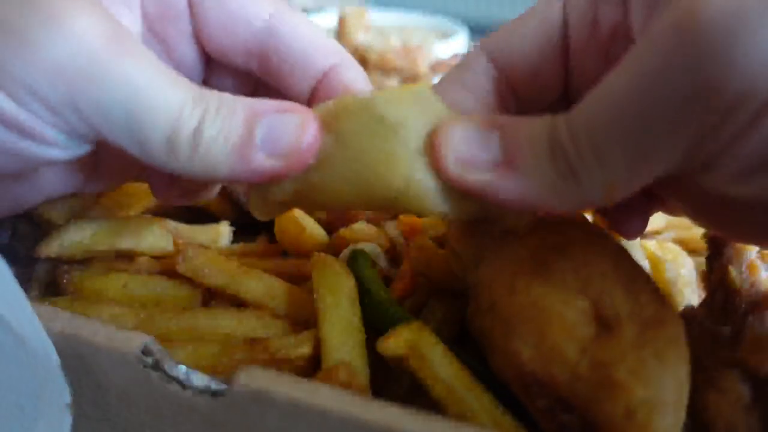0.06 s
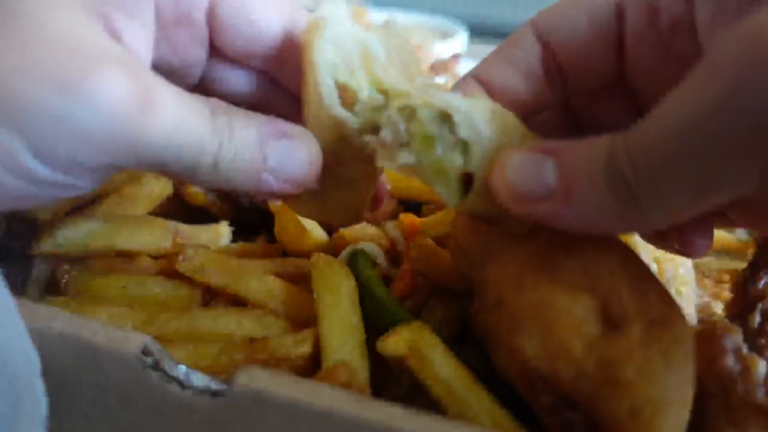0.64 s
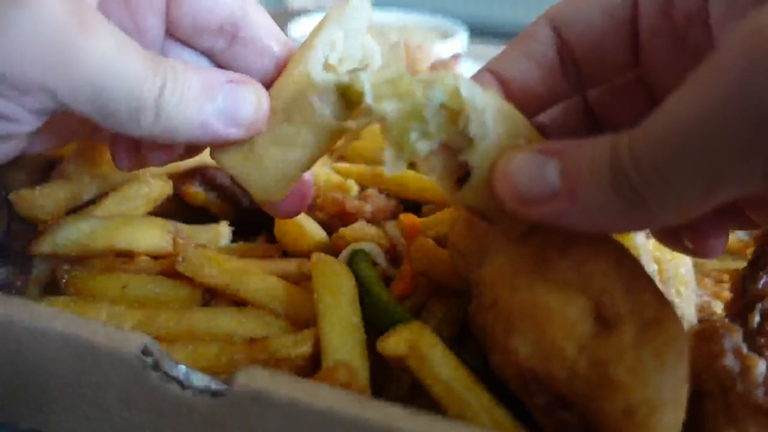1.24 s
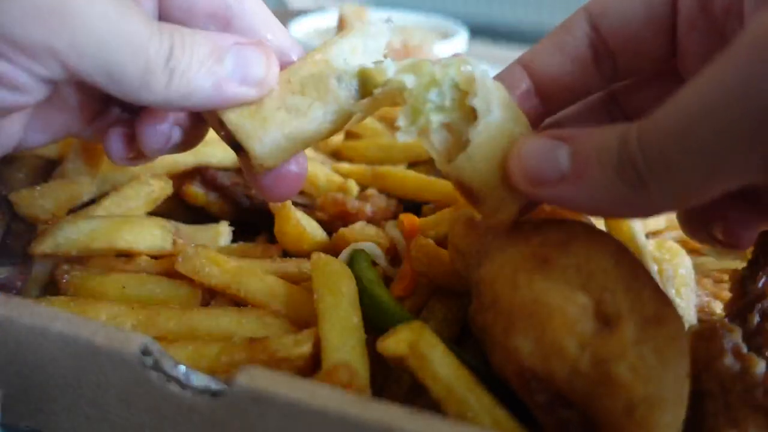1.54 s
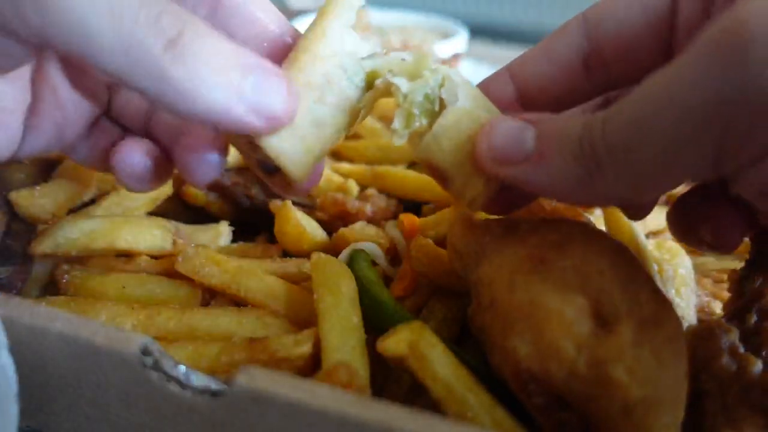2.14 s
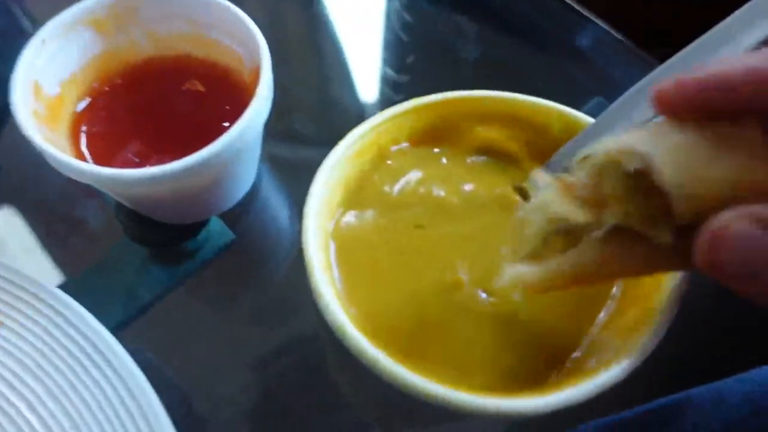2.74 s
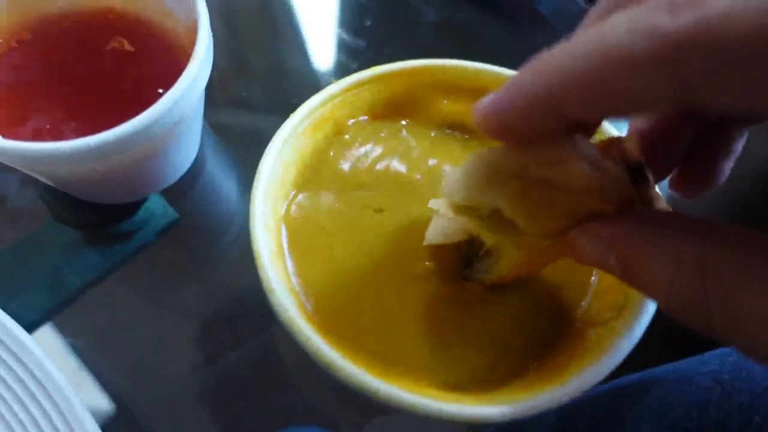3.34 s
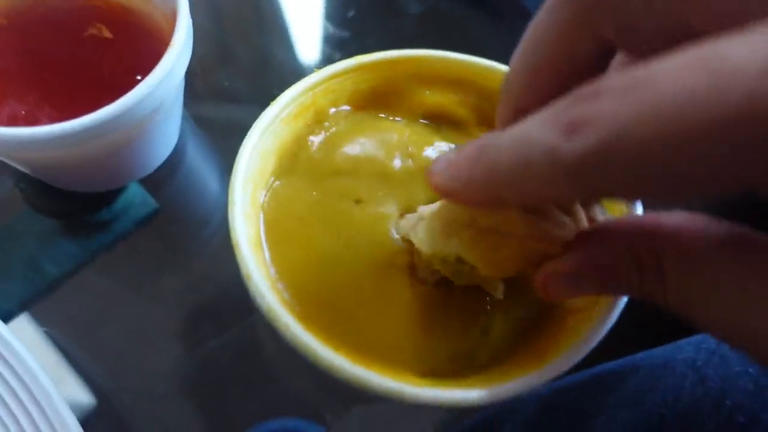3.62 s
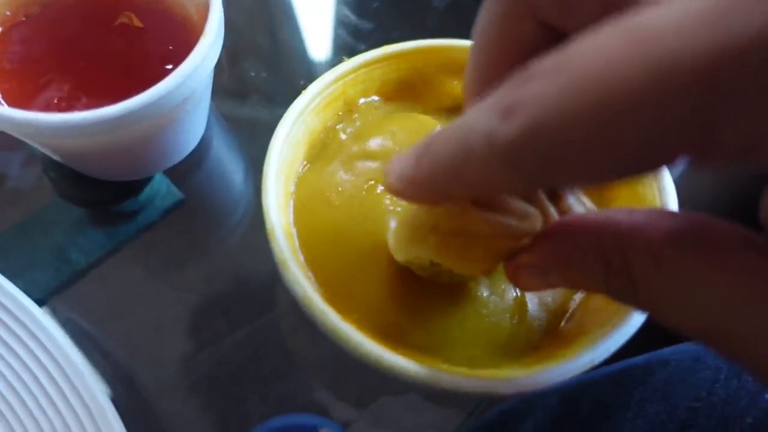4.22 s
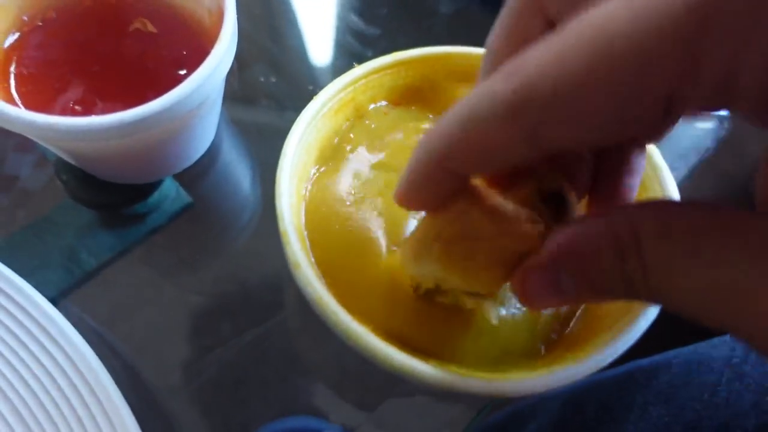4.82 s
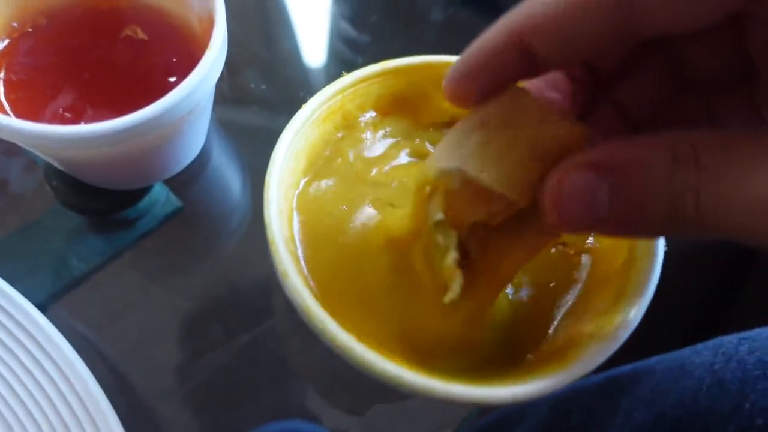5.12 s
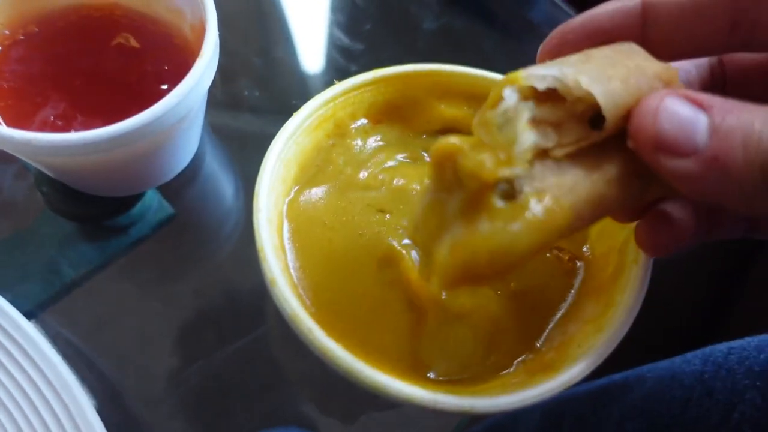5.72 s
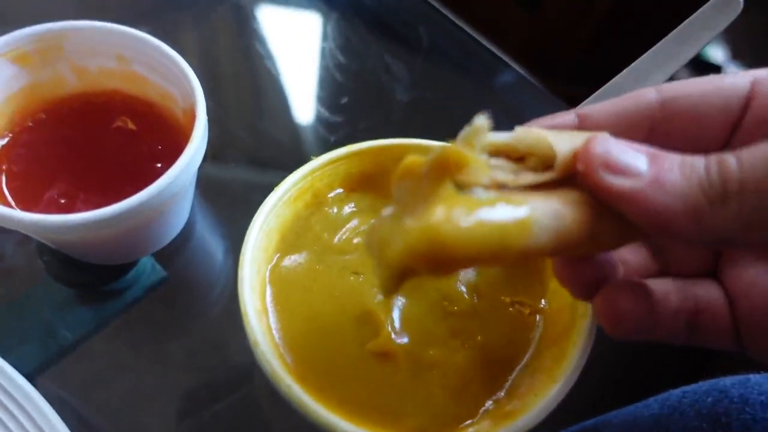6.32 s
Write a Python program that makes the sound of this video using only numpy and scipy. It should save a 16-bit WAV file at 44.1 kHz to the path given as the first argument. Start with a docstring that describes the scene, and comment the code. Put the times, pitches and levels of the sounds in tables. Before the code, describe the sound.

Close crunching of a fried pastry being broken, followed by soft squelches in a tub of sauce, over steady clock ticking.

```python
"""Spring roll, broken and dipped

A fried spring roll is bent and pulled apart close by: its shell creaks, crackles and snaps, and the
moist filling squeaks. One half is pushed through thick sauce with small sticky clicks and bumps the
bottom of the tub. A clockwork ticks once a second in the quiet room; a hand-held camera rumbles."""
import sys
import numpy as np
from scipy import signal
from scipy.fft import rfft, irfft, next_fast_len
from scipy.io import wavfile
from scipy.ndimage import uniform_filter1d

SR = 44100
rng = np.random.default_rng(int(sys.argv[2]) if len(sys.argv) > 2 else 0)


def persist_wave(psi):
    """Save psi, clipped to +-1, as 16-bit WAV."""
    counts = np.round(np.clip(psi, -1, 1) * 32767).astype(np.int16)
    wavfile.write(sys.argv[1], SR, np.atleast_2d(counts).T)


N = 289560


def amp(db):
    return 10 ** (np.asarray(db) / 20)


def unit(x):
    return x / np.sqrt(np.mean(x ** 2) + 1e-20)


def even(x):
    """Level x to rms 1 over a sliding 40 ms."""
    return x / np.sqrt(np.abs(uniform_filter1d(x ** 2, size=1800)) + 1e-6)


def burst(x):
    """Scale x to the energy of 1 ms at rms 1."""
    return x * np.sqrt(SR / 1000 / np.sum(x ** 2))


def add(track, start_s, x):
    part = track[round(start_s * SR):][:len(x)]
    part += x[:len(part)]


def log_interp(points, hz):
    point_hz, values = np.transpose(points)
    return np.interp(np.log(hz + 1), np.log(point_hz + 1), values)


def coloured(x, spectrum, size=4096):
    """Minimum-phase filter from rows of f/Hz, gain/dB."""
    gain = amp(log_interp(spectrum, np.fft.rfftfreq(size, 1 / SR)))
    cepstrum = irfft(np.log(gain))
    cepstrum[1:size // 2] *= 2
    cepstrum[size // 2 + 1:] = 0
    return signal.oaconvolve(x, irfft(np.exp(rfft(cepstrum))))[:len(x)]


def noise(spectrum):
    return unit(coloured(rng.standard_normal(N), spectrum))


def patchy(x, depth_db):
    """Shifting cavities and contacts give each moment its own resonances; rms 1."""
    bins = signal.stft(x, nperseg=256)[2]
    field = uniform_filter1d(rng.standard_normal(bins.shape), size=5, axis=0)
    field = unit(uniform_filter1d(field, size=9, axis=1))
    return unit(signal.istft(bins * amp(depth_db * field), nperseg=256)[1][:N])


def grains(per_s, spread_db, bed):
    """Tiny random fractures of very unequal size over a bed of rubbing noise."""
    sizes = amp(spread_db * np.minimum(rng.standard_normal(N), 2)) * rng.choice([-1, 1], N)
    impulses = sizes * (rng.random(N) < per_s / SR)
    return even(unit(impulses) + bed * rng.standard_normal(N))


def pops(per_s, pitch_hz, scatter, cycles, spread_db, bed):
    """Tiny pockets burst at random over a noise bed, each ringing at its own pitch."""
    count = int(per_s * N / SR)
    detune, size, polarity = np.hsplit(rng.standard_normal((count, 3)), 3)
    starts = (rng.random(count) * N).astype(int)
    hz = np.clip(pitch_hz * np.exp(scatter * detune), 200, 15000)
    n = np.arange(SR // 200)
    turns = hz * n / SR
    envelopes = amp(spread_db * np.minimum(size, 2) - 60 * turns / cycles)
    rings = envelopes * np.sin(2 * np.pi * turns) * np.sign(polarity)
    stream = np.bincount((starts[:, None] + n).ravel(), rings.ravel(), N)[:N]
    return even(unit(stream) + bed * rng.standard_normal(N))


def strokes(rows, grip, attack_s, release_s, swell_db):
    """Level/dB per layer: strokes set in, swell with pressure and die away over a faint loose grip."""
    t = np.arange(N) / SR
    begin_s, end_s, *grip_db = grip
    power = np.outer(amp(grip_db) ** 2, (t >= begin_s) & (t < end_s))
    for start_s, length_s, *layer_db in rows:
        age_s = t - start_s
        attack = np.clip(age_s / attack_s + 0.5, 0, 1)
        release = np.exp(-np.maximum(age_s - length_s, 0) / release_s)
        pressure = np.sin(np.pi * np.clip(age_s / length_s, 0, 1))
        power += np.outer(amp(layer_db), attack * release * amp(swell_db * (pressure - 1))) ** 2
    return 10 * np.log10(power + 1e-12)


# camera sway: t/s, rumble level/dB, rustle level/dB
CAMERA_SWAY = [(0, -58, -67), (1.7, -69.5, -73.5), (2.7, -54, -63), (3.3, -60.5, -66), (4.5, -63.5, -67),
               (5.7, -65.5, -69.5), (6.0, -53, -65), (6.57, -65, -71)]
# noise spectra: f/Hz, relative level/dB
RUMBLE_SPECTRUM = [(12, 7.5), (20, -2), (31, -7.5), (45, -7.5), (70, -24), (300, -60.5)]
RUSTLE_SPECTRUM = [(25, -3), (70, -3), (110, -0.5), (146, 5), (180, -0.5), (400, -4), (800, -8),
                   (1400, -14.5), (3000, -34)]
HISS_SPECTRUM = [(30, 8.5), (1000, 7), (2200, 4), (5000, -2.5), (8500, -3), (11000, -2.5), (16000, -5.5)]

def background():
    """The camera rumbles as it sways and the grip on it rustles, over a steady hiss."""
    times_s, *levels_db = np.transpose(CAMERA_SWAY)
    t = np.arange(N) / SR
    rumble_db, rustle_db = [np.interp(t, times_s, db) for db in levels_db]
    rumble = amp(rumble_db) * noise(RUMBLE_SPECTRUM)
    rustle = amp(rustle_db) * patchy(noise(RUSTLE_SPECTRUM), depth_db=3)
    return rumble + rustle + amp(-72.5) * noise(HISS_SPECTRUM)


# bends: t/s, length/s, rub level/dB, crunch level/dB, flake level/dB
SHELL_BENDS = [(0.0, 0.018, -46, -55.5, -56), (0.05, 0.088, -62, -62.5, -58),
               (0.14, 0.05, -59.5, -57, -55.5), (0.215, 0.054, -55.5, -55, -55.5),
               (0.28, 0.034, -65, -60, -58.5), (0.35, 0.13, -70, -65.5, -64.5),
               (0.485, 0.073, -53.5, -59.5, -62.5), (0.575, 0.037, -56.5, -55, -58),
               (0.633, 0.015, -56, -48.5, -50), (0.695, 0.015, -63.5, -51, -45),
               (0.747, 0.014, -61, -55.5, -47.5), (0.872, 0.023, -58.5, -52.5, -47),
               (0.98, 0.029, -70.5, -65.5, -60), (1.08, 0.1, -70, -71, -65), (1.33, 0.14, -88, -62, -57),
               (1.574, 0.016, -82, -69.5, -60), (2.125, 0.2, -81, -65, -62), (2.365, 0.17, -82, -67.5, -62),
               (2.52, 0.066, -61, -65.5, -58)]
# loose grip: from t/s, to t/s, rub level/dB, crunch level/dB, flake level/dB
DRY_GRIP = (-0.5, 3.5, -78, -75.5, -76)
# shell spectra: f/Hz, relative level/dB
RUB_SPECTRUM = [(50, -8), (130, -5.5), (230, -1), (380, -10), (520, -2.5), (1200, -1.5), (1800, -7),
                (3500, -16)]
CRUNCH_SPECTRUM = [(700, -46), (1500, -1), (2500, -1.5), (4500, 3), (6000, -10), (9000, -34)]
FLAKE_SPECTRUM = [(3500, -33), (5500, 1.5), (7000, 2), (8500, 7), (10500, -3), (13500, 5.5), (16000, -13)]

def shell():
    """Fingers rub the hollow skin; each bend crumbles a patch into crunch and fine flakes."""
    rub_db, crunch_db, flake_db = strokes(
        SHELL_BENDS, DRY_GRIP, attack_s=0.016, release_s=0.018, swell_db=0)
    fractures = grains(per_s=800, spread_db=10.5, bed=0.51)
    crumbs = pops(per_s=1300, pitch_hz=2420, scatter=0.62, cycles=12, spread_db=2.5, bed=0.41)
    friction = pops(per_s=700, pitch_hz=876, scatter=0.61, cycles=8, spread_db=3.5, bed=2.7)
    rub = patchy(coloured(friction, RUB_SPECTRUM), depth_db=2.5)
    crunch = patchy(coloured(fractures + 0.64 * crumbs, CRUNCH_SPECTRUM), depth_db=3)
    fine_pops = pops(per_s=1800, pitch_hz=9200, scatter=0.42, cycles=6.1, spread_db=7, bed=0.61)
    flakes = patchy(coloured(1.9 * fractures + fine_pops, FLAKE_SPECTRUM), depth_db=3.5)
    return amp(rub_db) * rub + amp(crunch_db) * crunch + amp(flake_db) * flakes


def chatter(modes, t60_s, rise_s, tilt_db_oct=0):
    """A contact stutters for a few ms and rings a body; the tilt acts above 2 kHz."""
    hz = np.linspace(0, SR / 2, 2049)
    gain = sum(amp(db) / (1 + (2 * (hz - mode_hz) / width_hz) ** 2) for mode_hz, width_hz, db in modes)
    gain_db = 20 * np.log10(gain) + tilt_db_oct * np.log2(np.maximum(hz / 2000, 1))
    t = np.arange(SR // 10) / SR
    force = rng.standard_normal(len(t)) * (1 - np.exp(-t / rise_s)) * amp(-60 * t / t60_s)
    return burst(coloured(force, np.column_stack([hz, gain_db])))


# first squeeze: t/s, level/dB
SKIN_CREAKS = [(0.009, -41), (0.074, -42), (0.12, -35), (0.1288, -33), (0.143, -40), (0.152, -32.5)]
# closed roll: f/Hz, width/Hz, relative level/dB
ROLL_MODES = [(750, 470, -10), (1120, 230, 1), (2060, 150, -3), (2390, 520, -3)]

def creaks():
    """The skin buckles and rings the hollow of the unbroken roll."""
    out = np.zeros(N)
    for start_s, db in SKIN_CREAKS:
        add(out, start_s, amp(db) * chatter(ROLL_MODES, t60_s=0.031, rise_s=0.00036))
    return out


# bright edge of a click: f/Hz, relative level/dB
CRACK_SPECTRUM = [(2000, -33.5), (6200, -6), (8500, 1), (10500, -7.5), (13500, 0.5), (16000, -10.5)]

def clicks(rows, body_spectrum, grit, fizz, body_t60_s, cycles):
    """A short ring, a noisy body and a bright crack; fizz makes weak clicks noisier."""
    out, t = np.zeros(N), np.arange(SR // 50) / SR

    def puff(spectrum, t60_s):
        decaying = rng.standard_normal(len(t)) * amp(-60 * t / t60_s)
        return burst(coloured(decaying, spectrum, size=1024))

    for start_s, ring_db, hz, crack_db in rows:
        swell = 1 - np.exp(-2 * t * hz)
        ring = burst(np.sin(2 * np.pi * hz * t) * swell * amp(-60 * t * hz / cycles))
        tilt_db_oct = 0.18 * (crack_db + 29)  # harder is brighter
        crack = puff([(f, db + tilt_db_oct * np.log2(f)) for f, db in CRACK_SPECTRUM], t60_s=0.0054)
        body = grit * amp(-fizz * (ring_db + 33.5)) * puff(body_spectrum, body_t60_s)
        add(out, start_s, amp(ring_db) * burst(ring + body) + amp(crack_db) * crack)
    return out


# shell cracks: t/s, ring level/dB, ring f/Hz, crack level/dB
SHELL_SNAPS = [(0.0255, -38, 557, -55), (0.143, -31.5, 4940, -26.5), (0.1527, -45, 2200, -38),
               (0.2642, -50, 2400, -42), (0.3695, -39.5, 3480, -49.5), (0.4085, -48.5, 3100, -51),
               (0.436, -43.5, 4280, -37.5), (0.511, -56, 5000, -43), (0.5254, -44, 4150, -43),
               (0.546, -30, 1710, -38.5), (0.606, -43, 3800, -49), (0.6258, -48, 4500, -40.5),
               (0.645, -39.5, 4340, -35.5), (0.656, -44, 4500, -41), (0.7105, -37, 4710, -25.5),
               (0.781, -51, 5000, -46), (0.8255, -47, 1530, -43.5), (0.8655, -43.5, 1500, -43),
               (0.893, -41, 1400, -44), (0.901, -53, 4500, -47), (0.9232, -46, 1660, -48),
               (1.072, -48.5, 2300, -51), (1.0909, -45, 2940, -45), (1.1044, -51, 5370, -35.5),
               (1.1202, -34, 1910, -29.5), (1.1303, -49, 2180, -43), (1.1428, -43, 2580, -41),
               (1.1512, -41.5, 2780, -37), (1.166, -42, 1850, -38.5), (1.177, -56, 3000, -50),
               (1.303, -53, 1940, -49), (1.3907, -47.5, 4540, -49), (1.4643, -44, 5170, -37.5),
               (1.5863, -45.5, 5030, -45), (1.838, -53, 3900, -56), (2.2113, -42.5, 2700, -38),
               (2.3364, -45, 5370, -43), (2.4695, -64, 3910, -39), (2.5014, -32.5, 1330, -28.5),
               (2.5079, -39.5, 2040, -43), (2.5133, -30, 2110, -20), (2.5151, -27, 8300, -13.3),
               (2.589, -46, 1100, -43)]
# splintering shell: f/Hz, relative level/dB
SPLINTER_SPECTRUM = [(60, -0.5), (180, 3.5), (450, -5), (1000, -1), (1900, -2), (4500, -1), (7500, -9.5),
                     (10000, -26)]

def snaps():
    """The dry shell cracks and knocks on the hollow roll."""
    return clicks(SHELL_SNAPS, SPLINTER_SPECTRUM, grit=0.52, fizz=0, body_t60_s=0.029, cycles=3.7)


# gear release, strike, rebound and latch: t/s, level/dB
TOOTH_CONTACTS = [(0.638, -39), (0.649, -33.5), (0.654, -33.5), (0.686, -38.5), (0.693, -41),
                  (0.701, -37.5), (1.628, -37), (1.637, -42), (1.647, -38), (1.655, -28.5), (1.66, -32.5),
                  (1.664, -32), (1.683, -40), (1.688, -38.5), (1.696, -40), (1.703, -37), (1.73, -37),
                  (1.747, -52), (2.625, -43.5), (2.637, -37), (2.645, -26.5), (2.653, -31), (2.659, -35),
                  (2.687, -35.5), (2.692, -37), (2.708, -38.5), (2.7612, -38.5), (3.629, -40.5),
                  (3.638, -39), (3.654, -30), (3.659, -30.5), (3.696, -43), (3.709, -40.5), (3.72, -40),
                  (3.745, -47), (4.629, -38), (4.635, -37.5), (4.647, -39), (4.651, -33), (4.66, -44),
                  (4.677, -38.5), (4.701, -39.5), (4.727, -45), (4.749, -38.5), (5.626, -42),
                  (5.639, -42.5), (5.653, -31), (5.661, -31), (5.684, -34), (5.691, -35), (5.7, -40.5),
                  (5.703, -41.5), (5.7259, -35.5), (5.743, -49.5)]
# clock case: f/Hz, width/Hz, relative level/dB
CASE_MODES = [(287, 110, -10), (800, 240, -11.5), (1407, 266, -3.5), (2145, 390, 0), (2940, 270, 0.5),
              (3380, 550, -7), (4310, 400, -1.5), (4780, 380, -4), (5630, 500, 0), (5960, 430, -7),
              (6900, 510, -9), (7500, 500, -14), (9070, 1500, -22.5)]

def clock(strike_s=0.644, release_db_oct=-4):
    """A gear steps once a second; its teeth ring the plastic case, dull before the strike."""
    out = np.zeros(N)
    for start_s, db in TOOTH_CONTACTS:
        releasing = start_s % 1 < strike_s
        tilt_db_oct = 0.12 * (db + 31) + release_db_oct * releasing  # harder is brighter
        tick = chatter(CASE_MODES, t60_s=0.024, rise_s=0.00075, tilt_db_oct=tilt_db_oct)
        add(out, start_s, amp(db) * tick)
    return out


# slips: t/s, length/s, first f/Hz, last f/Hz, level/dB
FILLING_SLIPS = [(1.988, 0.014, 3070, 2330, -57.5), (1.994, 0.072, 2250, 2350, -64.5),
                 (2.015, 0.051, 1596, 1695, -56.5), (2.048, 0.021, 2080, 2680, -54.5)]

def squeak(roughness=0.11):
    """Moist filling parts in short slips at an unsteady, gliding rate."""
    out = np.zeros(N)
    for start_s, length_s, first_hz, last_hz, db in FILLING_SLIPS:
        progress = np.linspace(0, 1, round(length_s * SR))
        jitter = unit(uniform_filter1d(rng.standard_normal(SR // 4), size=24))[:len(progress)]
        hz = (first_hz + (last_hz - first_hz) * progress) * (1 + roughness * jitter)
        tone = np.sqrt(2) * np.sin(2 * np.pi * np.cumsum(hz) / SR)
        add(out, start_s, amp(db) * np.sin(np.pi * progress) * tone)
    return out


# sauce letting go: t/s, ring level/dB, ring f/Hz, crack level/dB
SAUCE_CLICKS = [(2.821, -48.5, 3820, -45.5), (2.983, -43.5, 3020, -60), (3.062, -50, 2400, -59),
                (3.13, -37.5, 4250, -43), (3.1448, -43, 3980, -48), (3.161, -43, 3730, -53),
                (3.1662, -49, 4470, -52), (3.1758, -49, 3660, -45), (3.2795, -42, 2530, -50),
                (3.364, -47, 2950, -48.5), (3.4076, -39, 2540, -47.5), (3.611, -36, 2270, -35),
                (3.6162, -33, 2660, -38), (3.641, -42, 2300, -32.5), (3.7785, -39.5, 4300, -34),
                (3.919, -44, 2200, -53), (3.952, -42, 2400, -46), (4.008, -29.5, 2200, -40),
                (4.0241, -41, 2160, -62), (4.0797, -41.5, 2850, -32), (4.0888, -33, 2150, -39),
                (4.092, -34, 2030, -61), (4.0959, -40, 2170, -57.5), (4.8028, -41.5, 3600, -58),
                (4.8296, -46, 3500, -62), (4.8855, -47.5, 3880, -62), (5.0124, -43, 3290, -51.5),
                (5.2379, -47, 3980, -53), (5.391, -48, 3700, -61.5), (5.405, -53.5, 3500, -65.5),
                (6.104, -57, 4470, -57.5), (6.4935, -42, 3830, -44.5)]
# wet film: f/Hz, relative level/dB
PEEL_SPECTRUM = [(900, -13.5), (1900, 2), (2400, -5), (3400, -1), (5200, -1.5), (6400, -13), (8200, -6.5),
                 (10000, -24)]
# roll turned and drawn out: from t/s, to t/s
DRAW_OUT_S = (4.12, 5.22)

def sticky_clicks(strand_count=52):
    """Sauce peels off the crust; fine strands part at random as the roll is drawn out."""
    begin_s, end_s = DRAW_OUT_S
    when, size, pitch = rng.random((strand_count, 3)).T
    start_s = begin_s + when * (end_s - begin_s)
    ring_db, crack_db = -62 + 8 * size, -74 + 8 * size
    hz = 2600 * 2 ** (pitch - 0.5)
    rows = [*SAUCE_CLICKS, *zip(start_s, ring_db, hz, crack_db)]
    return clicks(rows, PEEL_SPECTRUM, grit=0.44, fizz=0.74, body_t60_s=0.018, cycles=9.2)


# pushes: t/s, length/s, squelch level/dB, flake level/dB
SAUCE_PUSHES = [(2.822, 0.041, -64.5, -65), (2.87, 0.11, -59, -75), (2.92, 0.046, -47, -62.5),
                (3.012, 0.022, -58, -65), (3.1, 0.069, -67, -73), (3.267, 0.026, -56.5, -65),
                (3.447, 0.011, -61.5, -52.5), (3.572, 0.1, -53, -60), (3.632, 0.033, -43.5, -52),
                (3.665, 0.023, -44, -61), (3.69, 0.12, -56.5, -71), (3.912, 0.056, -50, -61),
                (4.02, 0.055, -62.5, -66), (4.272, 0.028, -61, -66), (4.37, 0.11, -63, -71),
                (4.827, 0.019, -57.5, -63.5), (5.395, 0.031, -64.5, -70), (5.44, 0.12, -68, -77.5)]
# loose grip: from t/s, to t/s, squelch level/dB, flake level/dB
WET_GRIP = (3.5, 5, -71.5, -78.5)
# thick sauce: f/Hz, relative level/dB
SQUELCH_SPECTRUM = [(300, -12.5), (900, -11), (1550, -1), (2100, -1), (2900, -5), (3700, -10.5),
                    (4500, -7.5), (5700, -22.5), (9000, -45)]

def sauce(merge_db=-51, knee_db=6):
    """Single air pockets open in thick sauce; a firm push merges them into a smooth smear."""
    squelch_db, flake_db = strokes(
        SAUCE_PUSHES, WET_GRIP, attack_s=0.014, release_s=0.0062, swell_db=2.5)
    merged_share = 1 / (1 + np.exp((merge_db - squelch_db) / knee_db))

    def smear(x):
        return np.sqrt(1 - merged_share) * unit(x) + np.sqrt(merged_share) * rng.standard_normal(N)

    ticks = grains(per_s=390, spread_db=8, bed=0.42)
    pockets = pops(per_s=400, pitch_hz=2860, scatter=0.35, cycles=12, spread_db=5.5, bed=0.32)
    squelch = patchy(coloured(smear(ticks + 0.58 * pockets), SQUELCH_SPECTRUM), depth_db=0.5)
    fine_pops = pops(per_s=550, pitch_hz=8080, scatter=0.44, cycles=5.5, spread_db=6.5, bed=0.29)
    flakes = unit(coloured(smear(ticks + 0.64 * fine_pops), FLAKE_SPECTRUM))
    return amp(squelch_db) * squelch + amp(flake_db) * flakes


# tub and table: f/Hz, relative level/dB, t60/s
TUB_MODES = [(55.5, -50, 0.12), (138, -55.5, 0.13), (218, -55.5, 0.068)]

def bump(start_s=4.772, rise_s=0.034, gain_db=16):
    """The roll meets the tub's bottom; the padded contact wakes only low modes."""
    out, t = np.zeros(N), np.arange(SR // 4) / SR
    ring = sum(amp(db - 60 * t / t60_s) * np.sin(2 * np.pi * hz * t) for hz, db, t60_s in TUB_MODES)
    add(out, start_s, amp(gain_db) * (1 - np.exp(-t / rise_s)) * ring)
    return out


# reverberation: f/Hz, t60/s
ROOM_DECAY = [(200, 0.37), (2000, 0.12), (6000, 0.018), (14000, 0.066)]

def room(x):
    """A small room's tail; the bass lasts longest."""
    hz, t, bins = signal.stft(rng.standard_normal(SR // 3), SR, nperseg=256)
    t60_s = log_interp(ROOM_DECAY, hz)[:, None]
    tail = signal.istft(bins * amp(-60 * t / t60_s), SR, nperseg=256)[1]
    return signal.fftconvolve(x, tail / np.linalg.norm(tail))[:N]


# stereo hiss: f/Hz, relative level/dB
SIDE_SPECTRUM = [(500, 0.5), (2000, -8.5)]

def scene():
    """Food close, clock farther off, both centred; only a faint hiss has width."""
    food = shell() + creaks() + sauce() + snaps() + sticky_clicks() + squeak() + bump()
    ticking = clock()
    mid = food + ticking + room(amp(-25) * food + amp(-9) * ticking) + background()
    side = amp(-86.5) * noise(SIDE_SPECTRUM)
    return np.array([mid + side, mid - side])


def record(dry):
    """Steep low-pass at the camera's band limit."""
    cutoff_hz = 16200
    size = next_fast_len(N + SR // 4)
    hz = np.fft.rfftfreq(size, 1 / SR)
    gain = 1 / np.sqrt(1 + (hz / cutoff_hz) ** 160)
    return irfft(rfft(dry, size) * gain, size)[:, :N]


dry = scene()
out = record(dry)
persist_wave(out)
```